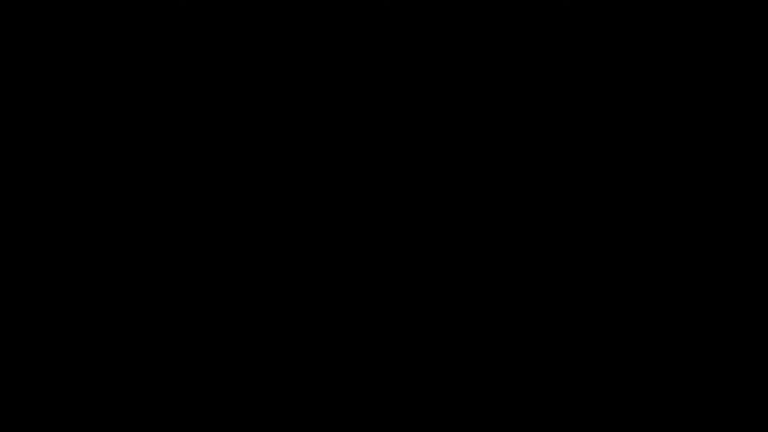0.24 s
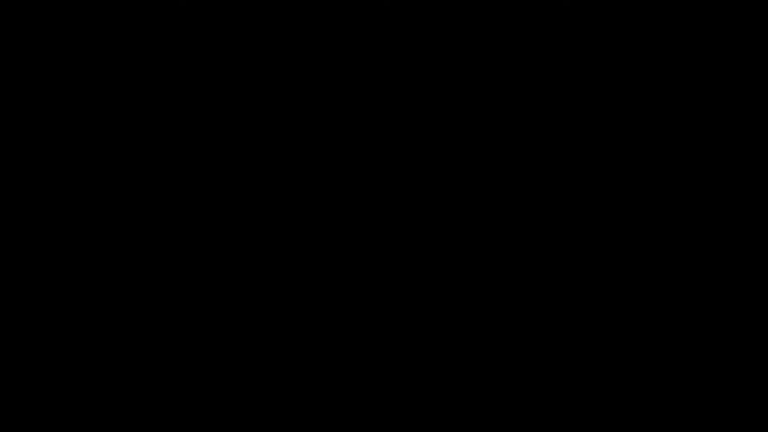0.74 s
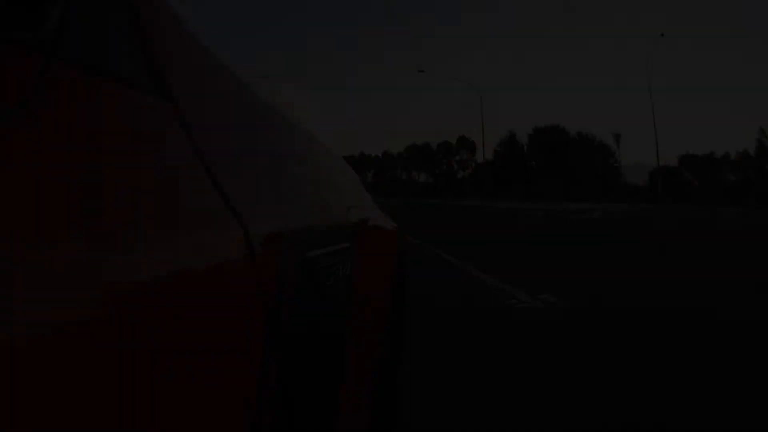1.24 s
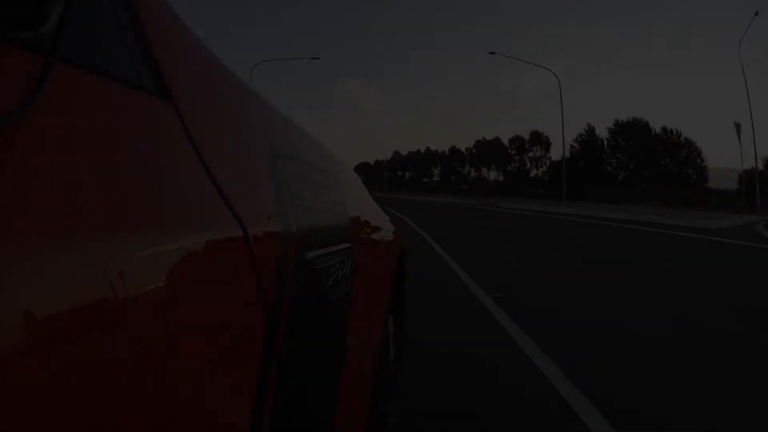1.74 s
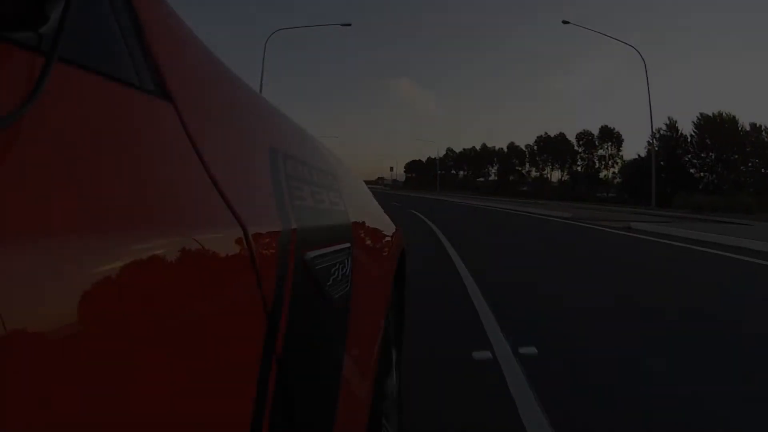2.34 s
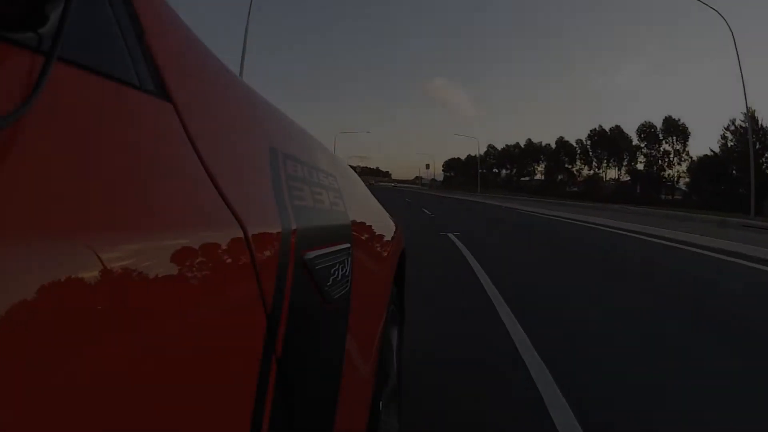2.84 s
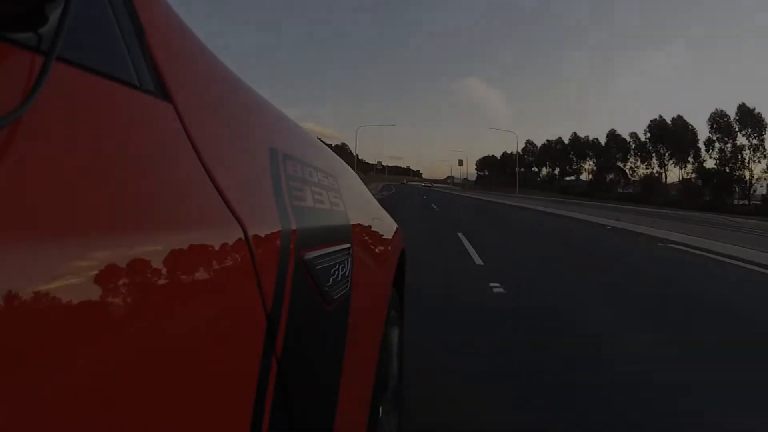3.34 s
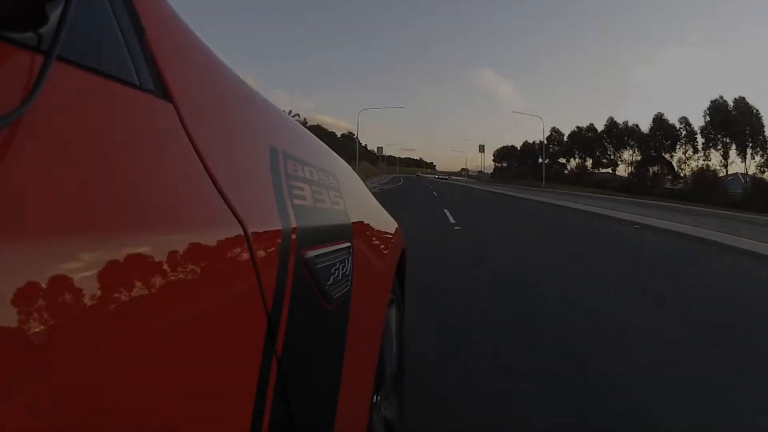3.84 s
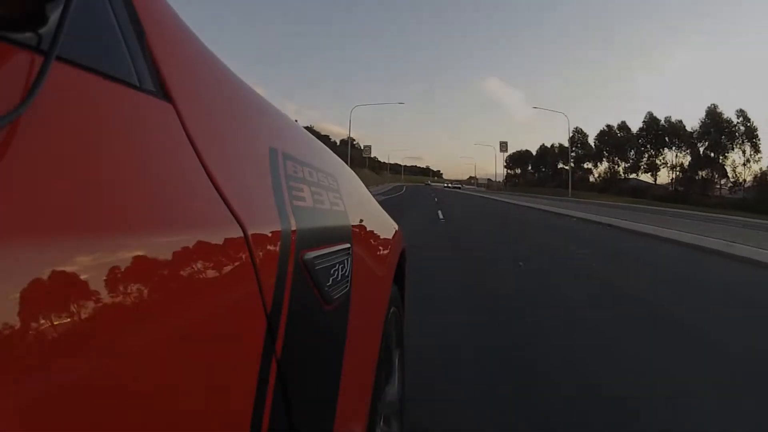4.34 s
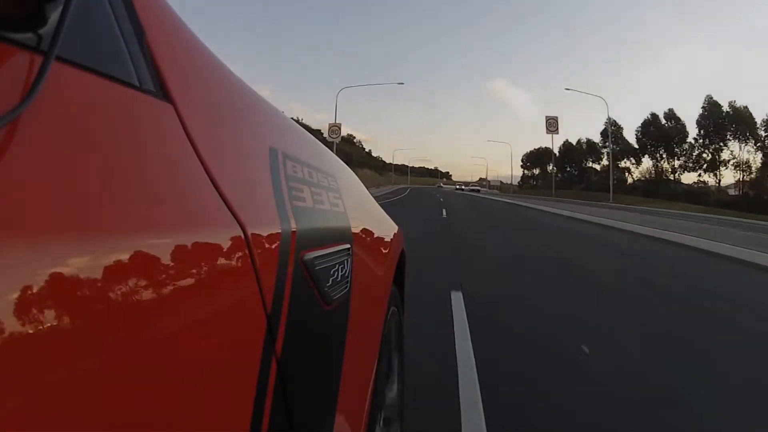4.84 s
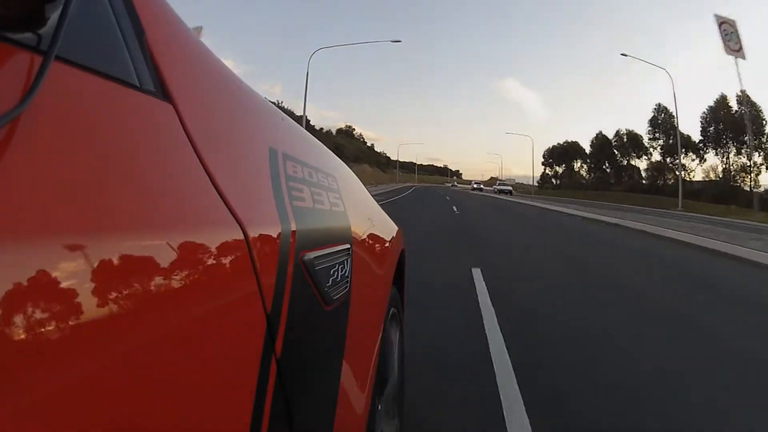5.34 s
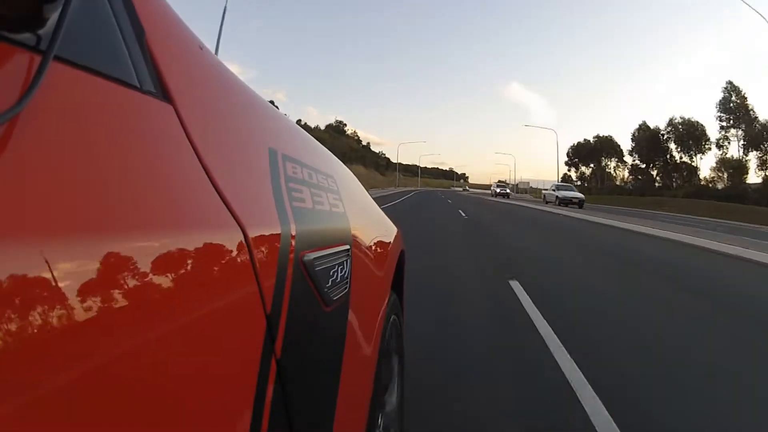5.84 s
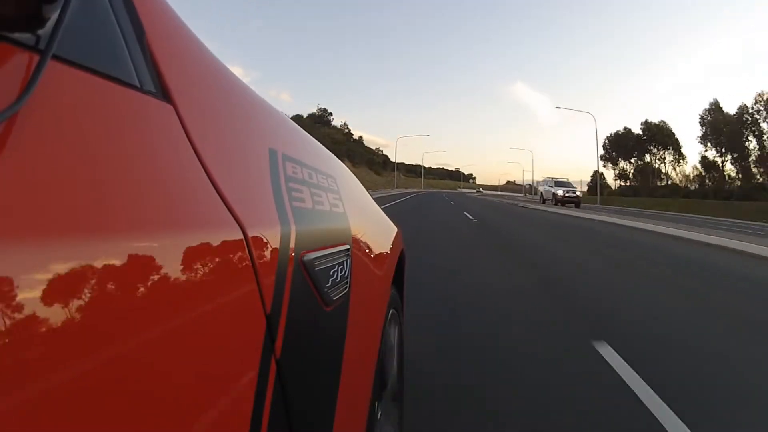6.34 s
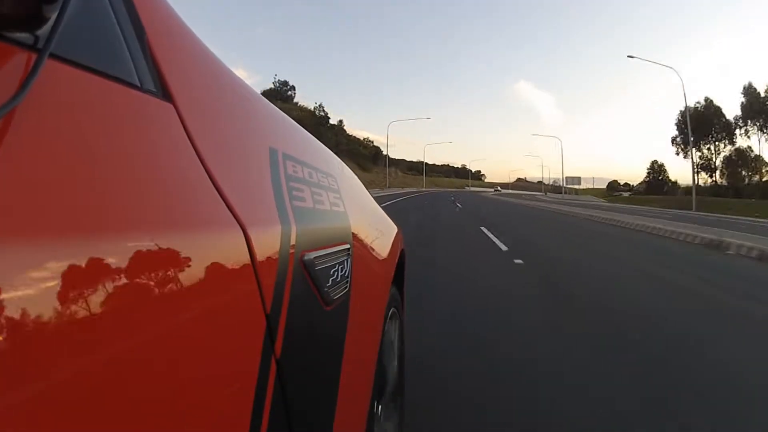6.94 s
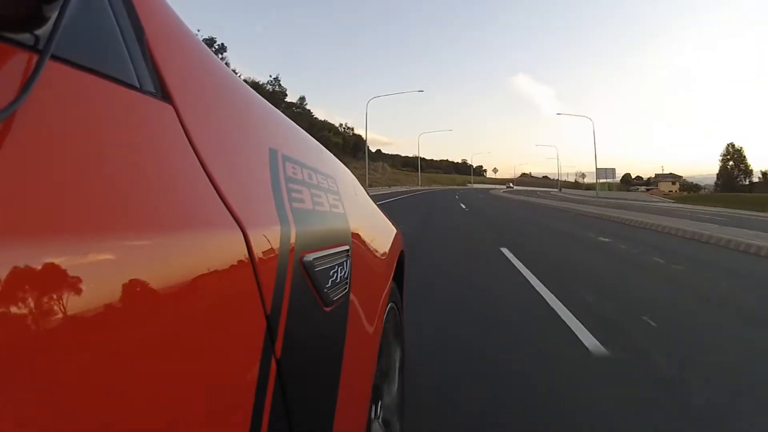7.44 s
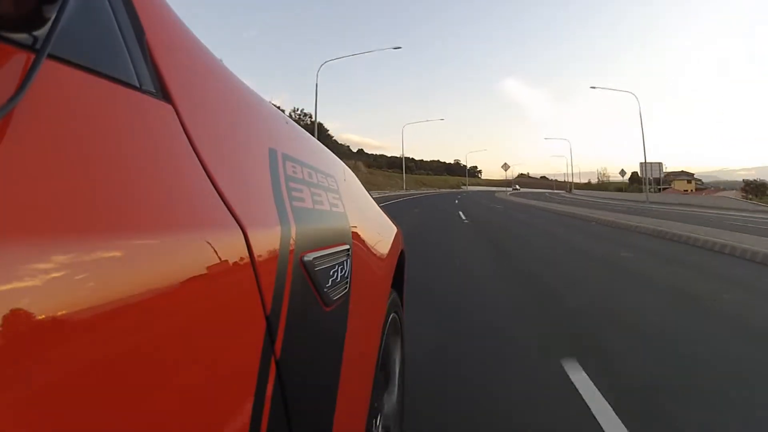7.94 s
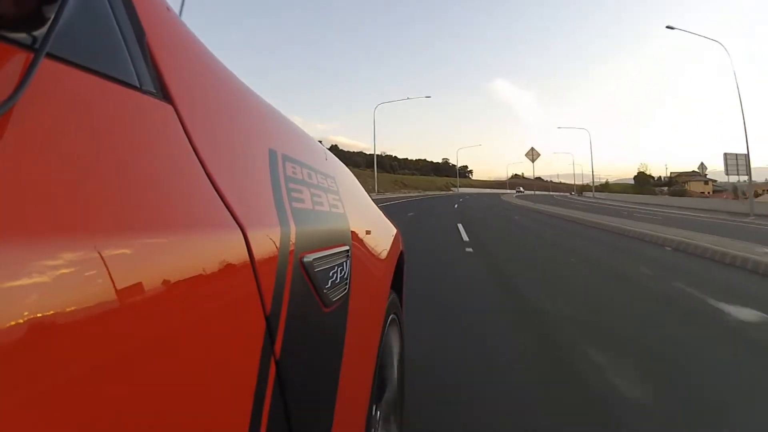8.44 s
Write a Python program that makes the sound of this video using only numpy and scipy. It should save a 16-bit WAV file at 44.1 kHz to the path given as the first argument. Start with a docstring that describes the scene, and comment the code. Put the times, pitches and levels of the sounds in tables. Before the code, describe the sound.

Heard from the car's flank, a powerful engine roars up in pitch, dips at two upshifts with a brief judder, and keeps accelerating over low wind rumble.

```python
"""A supercharged eight-cylinder car pulls hard through two gear changes, heard from a housed microphone on its flank.
After a short silence the sound fades in: engine-cycle orders, throbbing gas roar, hiss, a firing note and blower whine
are sums of moving harmonics and coloured noise; filtered noise gives the wind and, from about 1.4 s, a pipe boom.
Near 3.4 s and 6.9 s the throttle shuts, levels dip, an accessory whine clears, the boom flares and the pitch falls;
it judders after each clutch bite. At about 5.1 s a click falls together with a small upward step of pitch."""
import sys
import numpy as np
from scipy import signal
from scipy.fft import rfft, irfft, next_fast_len
from scipy.io import wavfile
from scipy.ndimage import uniform_filter1d

SR = 44100
rng = np.random.default_rng(int(sys.argv[2]) if len(sys.argv) > 2 else 0)


def attenuation_scalar(level_db):
    """Turn a level in dB into a linear amplitude multiplier (20 dB per decade)."""
    decades = np.asarray(level_db, float) / 20
    return 10 ** decades


def master_out(mix):
    """Clip the mix to full scale and print it as 16-bit PCM to the path in sys.argv[1]."""
    frames = np.transpose(np.atleast_2d(mix))
    ceiling = np.clip(frames, -1, 1)
    pcm = np.round(ceiling * 32767).astype(np.int16)
    wavfile.write(sys.argv[1], SR, pcm)


N = 382788
STEP = 64  # samples between control points
# gear changes: throttle shuts t/s, clutch bites t/s, scale of the judder in firing rate f/Hz
GEAR_CHANGES = [(3.44, 4.172, 8.5), (6.88, 7.629, 15.3)]
OPEN_S = .13  # time the throttle takes to open after the bite


def rms_one(x):
    """Normalisation: the root mean square becomes 1."""
    return x / np.sqrt(np.mean(x ** 2) + 1e-20)


def control_s():
    """Uniform sampling in time: the instants of the control points."""
    return np.arange(0, N + STEP, STEP) / SR


def coarse(rows):
    """Linear interpolation in time: table columns read at the control points."""
    s, *columns = np.transpose(rows)
    return [np.interp(control_s(), s, c) for c in columns]


def fine(control):
    """Linear interpolation: control points joined to every sample."""
    return np.interp(np.arange(N) / STEP, np.arange(len(control)), control)


def drift(rate_hz):
    """Low-pass random process: white noise through a double pole at rate_hz, rms 1, at the control points."""
    r = np.exp(-2 * np.pi * rate_hz * STEP / SR)
    slow = signal.lfilter([1], [1, -2 * r, r * r], rng.standard_normal(N // STEP + 2002))[2000:]
    return rms_one(slow)


def bumps(rows):
    """Gaussian envelopes in time: bell-shaped rises in dB."""
    return sum(db * np.exp(-.5 * ((control_s() - s) / width) ** 2) for s, db, width in rows)


def at_hz(points, hz):
    """Linear interpolation in dB on a logarithmic frequency axis."""
    at, db = np.transpose(points)
    return np.interp(np.log(hz), np.log(at), db)


def resonances(modes, hz):
    """Resonance curves: each mode adds a Lorentzian bell in dB."""
    return sum(top_db / (1 + (2 * (hz - mid_hz) / width) ** 2) for mid_hz, width, top_db in modes)


def colour_db(spectrum, hz):
    """Transmission response: a broad spectrum plus the resonances of the body."""
    # resonances of pipes, panels and housing: f/Hz, width/Hz, level/dB
    body = [(237, 230, 5.5), (353, 290, -4.5), (452.7, 68, 11.5), (478, 11, -1.5), (712, 63, 4),
            (1170, 155, -5.5), (2130, 930, 0), (2570, 360, 2.5), (5420, 170, 1.5), (7200, 480, 3)]
    at, db = np.transpose(spectrum)
    return np.interp(np.log(hz + 1), np.log(at), db) + resonances(body, hz)


def noise(spectrum):
    """Spectral shaping: white noise weighted in the frequency domain, rms 1."""
    size = next_fast_len(N)
    hz = np.arange(size // 2 + 1) * SR / size
    white = rfft(rng.standard_normal(size))
    return rms_one(irfft(white * attenuation_scalar(colour_db(spectrum, hz)), size)[:N])


def partial(hz, db, waver_db, blur, scatter):
    """Frequency modulation: a sinusoid of moving pitch and level db; blur and scatter are in radians."""
    gain = np.sqrt(2) * attenuation_scalar(db + waver_db * (drift(3.95) + drift(11.7)))
    phase = 2 * np.pi * np.cumsum(fine(hz)) / SR
    phase = phase + fine(blur * drift(12.5)) + scatter * rng.standard_normal()
    return fine(gain) * np.cos(phase)


def speed_change(hz):
    """Logarithmic derivative: share of the pitch gained or lost per second, smoothed."""
    return uniform_filter1d(abs(np.gradient(np.log(hz), STEP / SR)), size=40)


def series(hz, harmonics, path, modes, throttle, waver_db, blur):
    """Source and filter: harmonics of one pitch swell through resonances and sink while the pitch changes fast."""
    sunk_db = np.clip(7 * (speed_change(hz) - .6), 0, 13)
    low_gear = control_s() < GEAR_CHANGES[0][1]
    out = 0
    for k, (db, coast_db, low_db) in enumerate(harmonics, 1):
        source_db = db + coast_db * (1 - throttle) + low_db * low_gear
        path_db = at_hz(path, k * hz) + resonances(modes, k * hz)
        out = out + partial(k * hz, source_db + path_db - sunk_db, waver_db * (1 + 0.1 * k), blur * k, .4)
    return out


def revs():
    """Torsional oscillation: the firing rate in Hz, with a decaying judder after each clutch bite."""
    # engine speed before the judder: t/s, firing rate f/Hz
    speed = [(0.76, 146.8), (1.28, 170.0), (1.44, 184.5), (1.72, 214.6), (2.08, 238.7), (2.32, 269.0),
             (2.68, 301.5), (3.12, 357.3), (3.4, 386.1), (3.64, 367.4), (4.02, 318.7), (4.08, 294.1),
             (4.16, 246.6), (5.092, 292.3), (5.093, 296.7), (5.64, 329.1), (5.96, 355.5), (6.16, 363.7),
             (6.85, 408.1), (7.16, 384.6), (7.48, 343.1), (7.58, 324.4), (7.66, 296.7), (8.68, 327.2)]
    decay_s, judder_hz = .351, 4.44  # judder_hz is the rate just after the bite
    hz, = coarse(speed)
    for _, bite_s, swing_hz in GEAR_CHANGES:
        d = np.maximum(control_s() - bite_s, 0)
        # the quadratic term lowers the rate by 1.234 Hz each second
        swings = d * (judder_hz - .617 * d)
        hz = hz - swing_hz * np.exp(-d / decay_s) * np.sin(2 * np.pi * swings)
    return hz


def pedal():
    """Piecewise-linear control: throttle 0-1, and the dip 0-1 that follows each shutting."""
    shut_s, fall_s, back_s = .04, 0.058, 0.12
    s = control_s()
    shut = sum(np.clip((s - a) / shut_s, 0, 1) - np.clip((s - b) / OPEN_S, 0, 1) for a, b, _ in GEAR_CHANGES)
    dip = sum(np.interp(s - a, [0, fall_s, fall_s + back_s], [0, 1, 0]) for a, _, _ in GEAR_CHANGES)
    return 1 - shut, dip


def cycle_orders(cycle_hz, throttle):
    """Fourier series of the two-turn cycle: unequal cylinders and pipes sound its orders, coloured by the path."""
    # order numbers: multiples of the cycle rate
    orders = [k for k in range(3, 37) if k % 8] + [40, 48]
    # one relative level/dB per order, at full throttle and coasting
    pulling = [0, 1, 3.5, 4.5, -1.5, 1, 7.5, 5, 4, -2, 5, 5, -2.5, 5.5, 5, -11, 5, 4.5, 4.5, 4.5, 8.5, -2,
               5.5, 5.5, -5, 6, 2, 2.5, 10, 4, 7, 8]
    coasting = [8, 6.5, -5, 9, -2, -3, 4, 5, 4, 0, -1, -6, -1, -3, 0, -4, -4, 3, -3, -2, -6, -2, -4, -2, -4,
                -4, -5, -8, -10, 0, 0, 2]
    # broad colour of bodywork and housing: f/Hz, level/dB
    path = [(47, -66), (80, -39), (214, -9), (354, 3), (399, -6.5), (541, -6), (700, 0.5), (839, 1),
            (1320, 3.5), (3000, -18.5), (3900, -50), (6600, -120)]
    unrest = .005 + .02 * speed_change(cycle_hz)  # high orders and sudden speed changes blur the lines
    total = 0
    for k, pull_db, coast_db in zip(orders, pulling, coasting):
        hz = k * cycle_hz
        db = coast_db + throttle * (pull_db - coast_db) + colour_db(path, hz)
        # limited phase scatter lets the orders pile up into pulses
        total = total + partial(hz, db, 1.58, unrest * k, scatter=1.4)
    return rms_one(total)


def roar(firing_hz):
    """Amplitude modulation: gas noise swells with each firing, each turn and each two-turn cycle."""
    # relative spectral density: f/Hz, level/dB
    spectrum = [(59, -73), (100, -44), (314, -8), (586, -13.5), (725, 0.5), (1310, 7.5), (2170, -9),
                (2560, -27.5), (5000, -27), (6500, -66), (11000, -120)]
    turns = 2 * np.pi * np.cumsum(fine(firing_hz)) / SR  # phase of the firings in radians
    # once per firing, per turn of four firings and per cycle of eight
    beat_db = 3.2 * np.cos(turns) + 1.8 * np.cos(turns / 4) + 1.5 * np.cos(turns / 8)
    throb_db = beat_db + fine(0.47 * drift(9.7))
    return rms_one(noise(spectrum) * attenuation_scalar(throb_db))


def hiss(throttle):
    """Modulated broadband noise: the treble flickers, more so with the throttle shut."""
    # relative spectral density: f/Hz, level/dB
    spectrum = [(1470, -38), (2500, 0), (3060, -6.5), (3980, -10.5), (4980, -14.5), (5530, -13.5),
                (6380, -18.5), (10000, -31), (15000, -41.5)]
    flicker_db = 0.86 * drift(6.3) + (0.55 + 0.62 * (1 - throttle)) * drift(60)
    return attenuation_scalar(fine(flicker_db)) * noise(spectrum)


def firing_note(firing_hz, throttle):
    """Harmonic series of the firing rate, filtered by the pipe resonances."""
    # harmonics: level/dB pulling, change/dB coasting, change/dB in the lowest gear
    harmonics = [(-0.4, -8, -1), (-4.5, 3.5, -2.5), (-6, -5, 3), (-13, 6, 5.5)]
    # broad colour of the pipe: f/Hz, level/dB
    pipe = [(149, -45.5), (230, -33.5), (330, -29), (403, -36.5), (544, -35.5), (854, -31.5), (1200, -20.5),
            (1620, -33.5)]
    # pipe resonances: f/Hz, width/Hz, level/dB
    modes = [(265.5, 12, 7.1), (308, 10, 3.8), (358.4, 59, 12.9), (446, 45, 16.2), (579, 44, 9),
             (736, 176, 8), (910, 72, 6.9), (1060, 9.9, 4), (1147, 40, 5.8), (1250, 89, 2.3),
             (1396, 100, 7.8), (1465, 32, 6.6)]
    return series(firing_hz, harmonics, pipe, modes, throttle, .7, .15)


def blower(cycle_hz, throttle, octaves):
    """Harmonic series of the rotor pulses; in the lowest gear some harmonics fade and others grow with the revs."""
    # harmonics: level/dB pulling, change/dB coasting, change/dB in the lowest gear
    rotor = [(5.5, -23, -4), (4, -9, -7), (0.5, -1, -3), (-1, -8, -6.5), (-6.5, -3, -2.5), (-2.5, -8, -15),
             (-6, -6, -16), (-4.5, 3, -8), (-9, 2, -6), (-5, 5, -6), (-5, 4, -6), (-9, 8, -6)]
    # one slope per harmonic in the lowest gear: dB per octave of engine speed
    slopes = [-8, 2.5, -7, -8, -8, -6, -4, 3, 3, 3, 3, 3]
    # broad colour of the intake: f/Hz, level/dB
    intake = [(326, -32), (577, -49), (760, -39.5), (1300, -36), (1750, -35.5), (1975, -41.5), (3000, -39),
              (3600, -54), (6000, -56.5), (10500, -65)]
    # intake resonances: f/Hz, width/Hz, level/dB
    modes = [(684, 123, 16), (802, 29, 6.7), (1056, 106, 15.4), (1173, 116, 8.9), (1273, 51, 3.4),
             (1466, 75, 3.5), (1513, 41, 12.3), (1700, 230, 9), (1850, 41, 7.9), (2103, 63, 11.7),
             (2261, 37, 10.5), (2470, 140, 9.5), (2873, 110, 11), (3200, 390, 6.8), (3980, 380, 8.9),
             (4850, 300, 9), (5680, 200, 10), (7100, 400, 6)]
    harmonics = [(db, coast_db, low_db + slope * octaves) for (db, coast_db, low_db), slope in zip(rotor, slopes)]
    return series(17.42 * cycle_hz, harmonics, intake, modes, throttle, 1.6, .19)  # 17.42 pulses per cycle


def wind():
    """Band-limited turbulence noise: a lumpy rumble with gusts, and a broader buffet that grows with time."""
    # gusts: t/s, rise/dB, width t/s
    gusts = [(1.35, 28, 0.091), (1.66, 24, .06), (3.11, 15.5, 0.11), (3.68, 3.7, .05), (4.42, 3.3, .1),
             (5.02, 4, .06), (6.21, 4.7, 0.18), (7.42, 10, 0.28), (8.64, 3, 0.053)]
    low = signal.sosfilt(signal.butter(3, [72, 115], "band", fs=SR, output="sos"), rng.standard_normal(N))
    broad = signal.sosfilt(signal.butter(1, [30, 130], "band", fs=SR, output="sos"), rng.standard_normal(N))
    rumble_db = -70.5 + 1.5 * control_s() + bumps(gusts)
    buffet_db = -75 + 3.5 * control_s() + 1.6 * drift(2.7)
    rumble = rms_one(low * attenuation_scalar(fine(1.2 * drift(1.8)))) * attenuation_scalar(fine(rumble_db))
    return rumble + rms_one(broad) * attenuation_scalar(fine(buffet_db))


def boom(firing_hz):
    """Resonance: noise passes twice through one narrow pipe mode, its level set by engine speed."""
    # level against firing rate: f/Hz, level/dB
    by_revs = [(147, -55), (185, -24.5), (250, -24), (275, -35), (300, -34), (330, -35), (410, -102)]
    # flares around the gear changes: t/s, rise/dB, width t/s
    flares = [(3.99, 13, 0.09), (4.36, 3, 0.14), (7.68, 11, 0.1)]
    mode_hz, width_hz = 455, 34  # width of a single pass
    b, a = signal.iirpeak(mode_hz, mode_hz / width_hz, fs=SR)
    rung = signal.lfilter(b, a, signal.lfilter(b, a, rng.standard_normal(N)))
    level_db = at_hz(by_revs, firing_hz) + bumps(flares) + 1.5 * drift(2.6)
    return rms_one(rung) * attenuation_scalar(fine(level_db))


def accessory(cycle_hz, throttle, octaves):
    """Harmonic series of a belt-driven whine: the belt slips under load; shut throttle brings the whine out."""
    # harmonics: level/dB pulling, change/dB coasting, change/dB in the lowest gear
    harmonics = [(0, 8, 0), (7, 9, 3), (-2.5, 7, 0), (-9.5, 6, 4), (-8.5, 6, 1.5), (-11, 8, 1),
                 (-10, 5, -1), (-17, 7, -2), (-21, 9, -2), (-23, 10, -2)]
    # broad colour of the housing: f/Hz, level/dB
    housing = [(500, -31), (1270, -41), (2050, -73), (3030, -52), (5000, -48), (6400, -59.5), (8000, -55),
               (9500, -58), (13000, -54)]
    # housing resonances: f/Hz, width/Hz, level/dB
    modes = [(1820, 120, 9), (2760, 360, 15.6), (3710, 180, 8.4), (4220, 180, 13.4), (4660, 390, 2.9),
             (5470, 670, 17.4), (7080, 610, 15), (7900, 300, 6)]
    pulses_per_cycle, belt_slip = 26.86, .006  # slip: share of speed lost at full throttle
    clearing_s = .45
    hz = pulses_per_cycle * (1 - belt_slip * throttle) * cycle_hz
    s = control_s()
    clear = sum(np.clip((s - a) / clearing_s, 0, 1) * (s < b + OPEN_S) for a, b, _ in GEAR_CHANGES)
    whine = series(hz, harmonics, housing, modes, 1 - clear * (1 - throttle), 1.7, .15)
    return attenuation_scalar(fine(4 * octaves)) * whine  # 4 dB per octave of engine speed


def scene():
    """Superposition: orders, roar, hiss and whines follow engine speed and pedal, with boom and wind beside them."""
    # levels of orders, roar, hiss: level/dB at full throttle; change/dB coasting; dip/dB as the throttle shuts
    pull_db = [-19, -20, -30]
    coast_db = [1.5, 2, 3.5]
    dip_db = [-7.5, -2, -6.5]
    # slow change of level: t/s, orders level/dB, roar level/dB, hiss level/dB
    effort = [(.77, 2, 7, 4), (1.05, -2, 0, -0.5), (1.6, 2, 3, 0.7), (2.7, 1.5, 3, 0.5),
              (3.4, 2.5, -1, 0.5), (4.14, 1.5, 4, 1), (4.5, 0.5, 1.3, -2), (5, 1, 2.5, 1),
              (5.8, 0.5, 0.7, 1.5), (6.8, 4, 0, 1), (7.1, 1, 3.5, 1.5), (7.6, 0.5, 3, 1), (8.1, 0, 2.7, 2),
              (8.68, 0.5, 1, 3)]
    firing_hz = revs()
    throttle, dip = pedal()
    octaves = np.log2(firing_hz / 294)  # around a middle firing rate in Hz
    cycle_hz = firing_hz / 8  # eight firings per cycle
    orders_gain, roar_gain, hiss_gain = (
        attenuation_scalar(fine(pull + coast * (1 - throttle) + depth * dip + slow))
        for pull, coast, depth, slow in zip(pull_db, coast_db, dip_db, coarse(effort)))
    car = orders_gain * cycle_orders(cycle_hz, throttle)
    car += roar_gain * roar(firing_hz)
    car += hiss_gain * hiss(throttle)
    tones = firing_note(firing_hz, throttle) + blower(cycle_hz, throttle, octaves)
    tones = tones + accessory(cycle_hz, throttle, octaves)
    tones_gain = attenuation_scalar(fine(-2 * dip))  # the tones dip by 2 dB
    return (car + tones_gain * tones + wind() + boom(firing_hz))[None]


def roll_off(x):
    """The treble ends steeply here."""
    return signal.sosfilt(signal.butter(12, 15770, fs=SR, output="sos"), x)


def record(dry):
    """Nonlinear transduction: a lopsided capsule overloads softly; then bass cut, linear fade-in and a click."""
    start_s, fade_s = 0.77, 2.0
    click_s, click_db, click_decay_s = 5.0923, -6, .00016
    # the squared term makes the response lopsided
    bent = signal.sosfilt(signal.butter(4, 150, "high", fs=SR, output="sos"), .22 * dry ** 2)
    rounded = 1.18 * np.tanh((dry + bent) / 1.18)
    cut = signal.sosfilt(signal.butter(2, 70, "high", fs=SR, output="sos"), rounded)
    t = np.arange(N) / SR
    faded = cut * np.clip((t - start_s) / fade_s, 0, 1)
    after = t - click_s
    click = attenuation_scalar(click_db) * (after >= 0) * np.exp(-np.maximum(after, 0) / click_decay_s)
    return roll_off(faded - click)


dry = scene()
out = record(dry)
master_out(out)
```